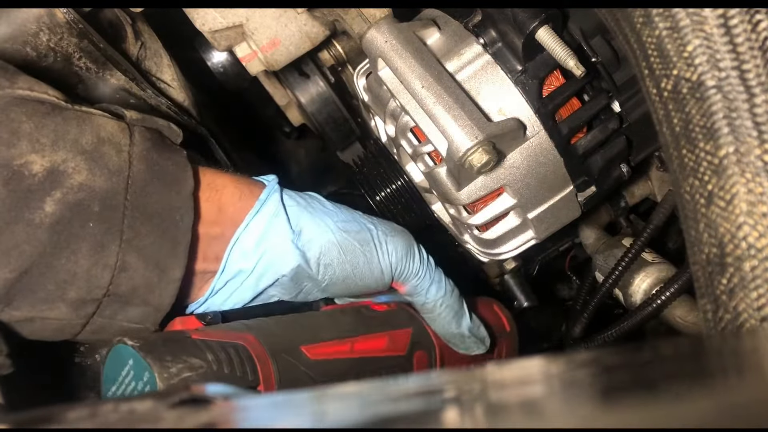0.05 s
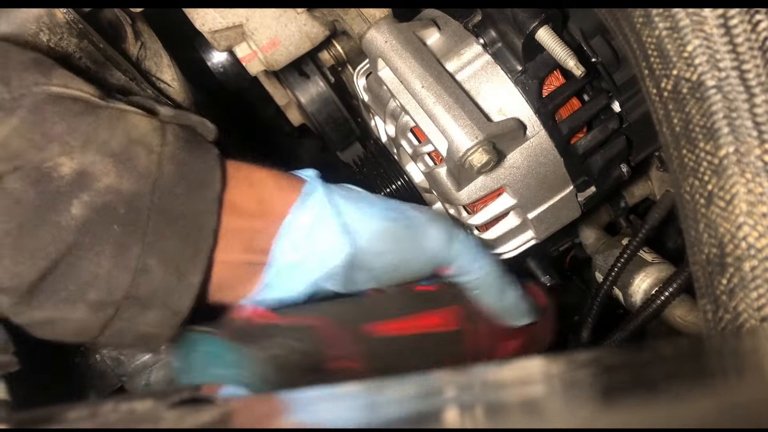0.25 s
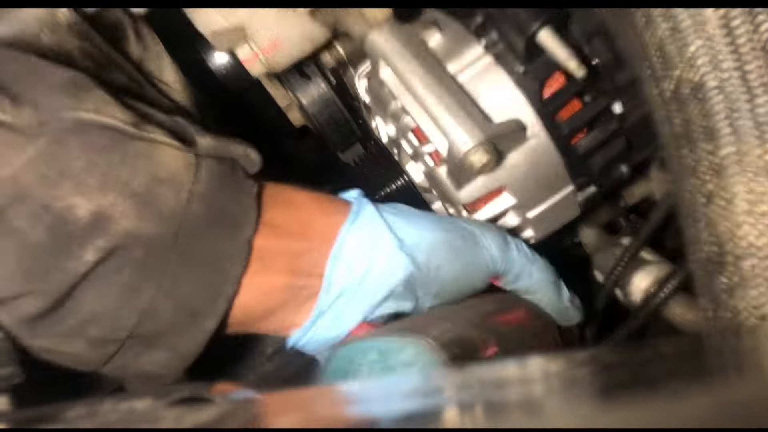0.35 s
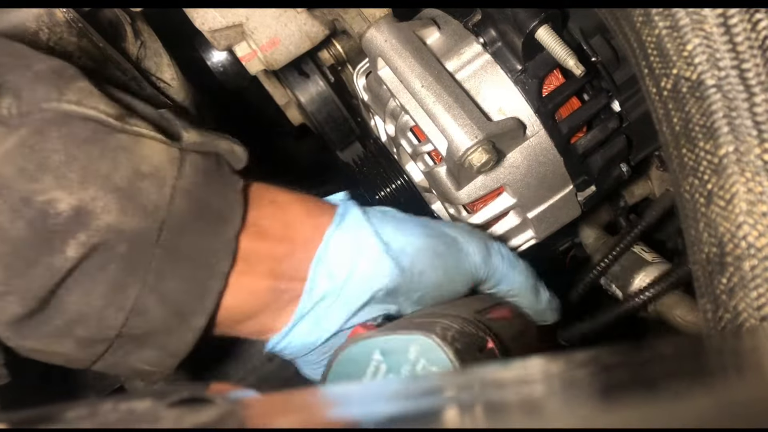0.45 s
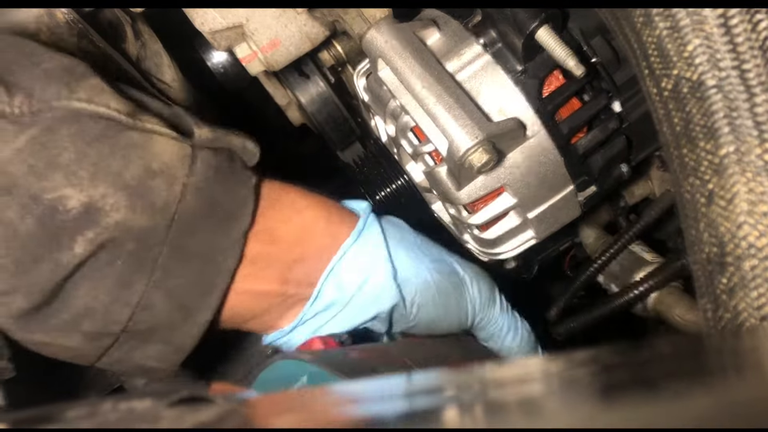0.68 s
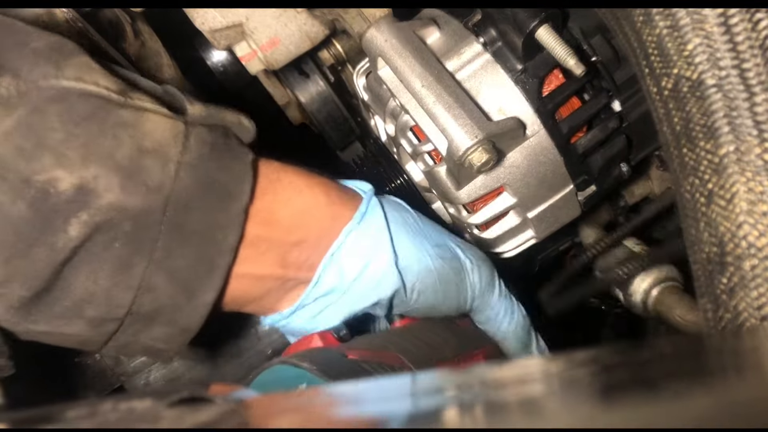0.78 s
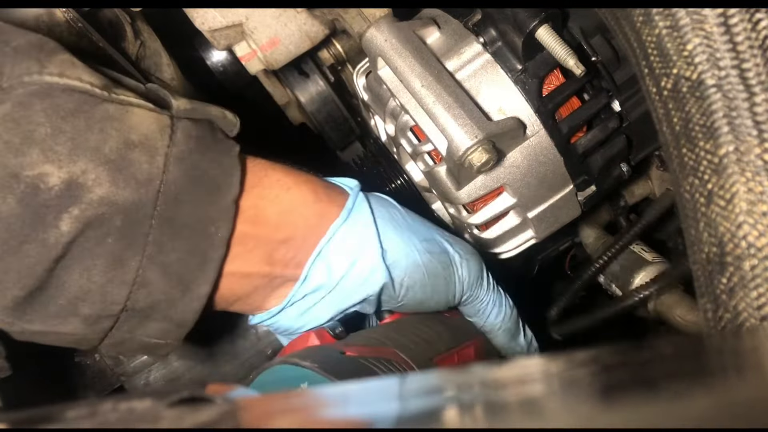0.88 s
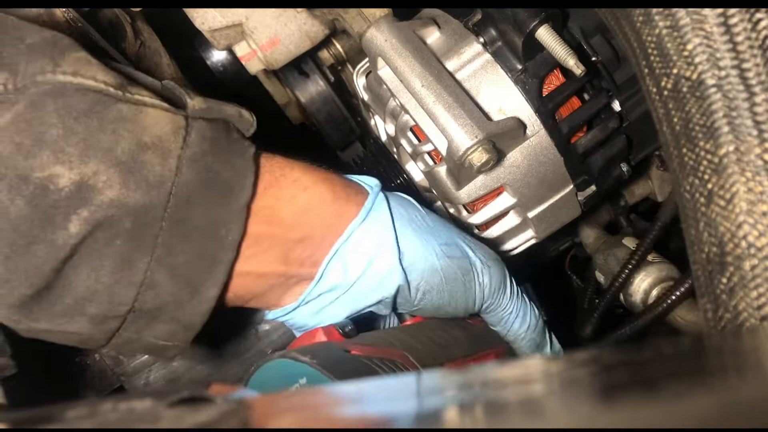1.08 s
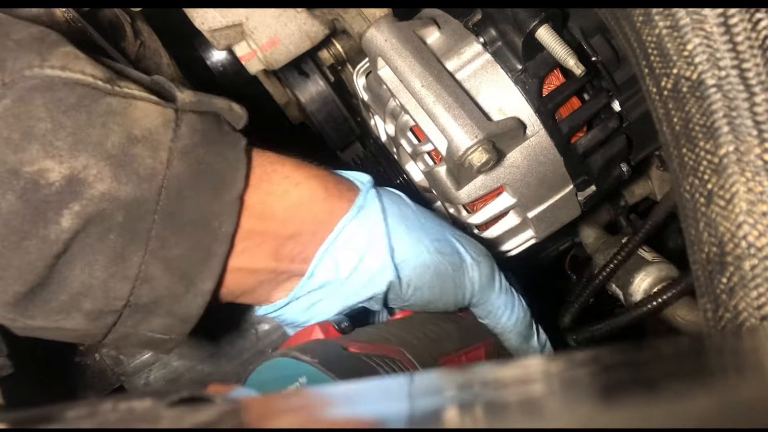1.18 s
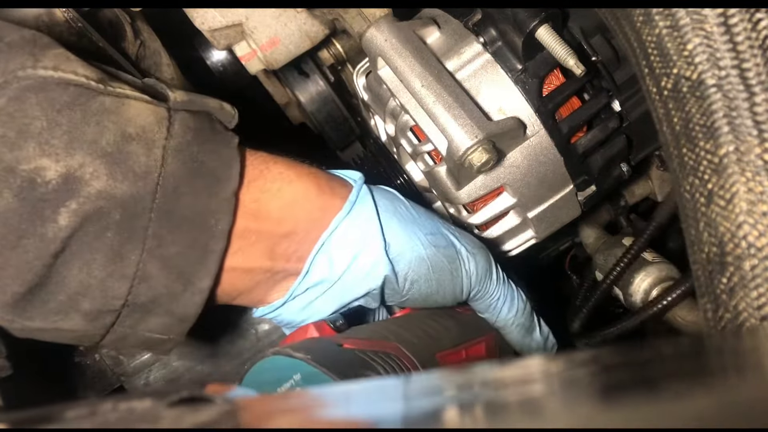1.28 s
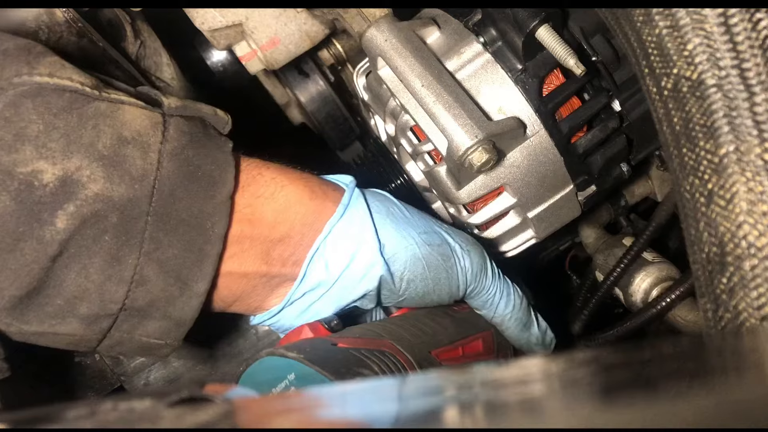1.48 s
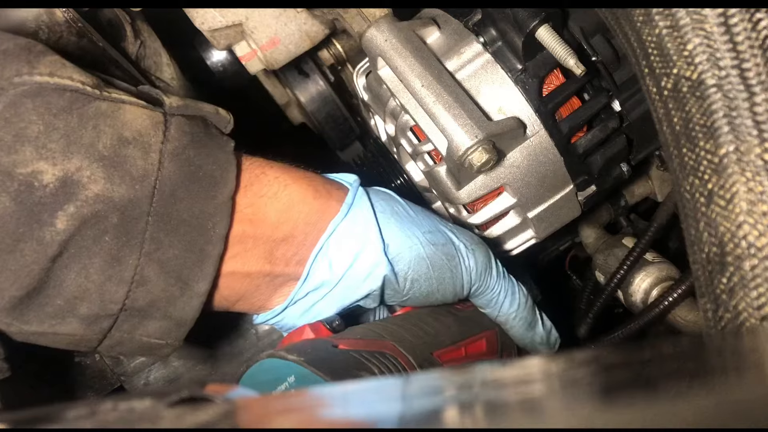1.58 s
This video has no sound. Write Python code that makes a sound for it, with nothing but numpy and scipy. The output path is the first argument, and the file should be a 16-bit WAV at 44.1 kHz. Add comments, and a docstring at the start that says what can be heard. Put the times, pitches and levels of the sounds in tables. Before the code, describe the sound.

Close mono pickup in a cramped engine bay: sharp ratchet clicks, growing plastic scrape, a cluster of clattering knocks, one more hard knock, then near quiet with tiny taps and distant rumble.

```python
"""First come pawl clicks and scraping, as a gloved hand swings a cordless ratchet back in a cramped engine bay.
A thin whine sounds briefly; the tool drags, knocks hoses and brackets, then settles with light taps.
Clicks ring tuned modes for steel, shell and bay; shaped noise adds crack, clatter, scrape and small ticks.
Distant outdoor rumble lies underneath as steady noise; everything reaches one microphone channel."""
import sys
import numpy as np
from scipy import signal
from scipy.io import wavfile

SR = 44100
rng = np.random.default_rng(int(sys.argv[2]) if len(sys.argv) > 2 else 0)


def inscribe(sig):
    """Save sig as 16-bit PCM at rate SR to the path in sys.argv[1].

    A 1-D sig is mono; a 2-D sig holds one channel per row.
    Samples are clipped to [-1, 1] before scaling.
    """
    pcm = np.round(np.clip(np.atleast_2d(sig).T, -1, 1) * 32767)
    wavfile.write(sys.argv[1], SR, pcm.astype(np.int16))


N = 72765
T = np.arange(N) / SR  # seconds

# Spectrum of the distant outdoor rumble: pitch_hz [Hz], relative density_db [dB per Hz]
OUTDOOR_SPECTRUM = [(15, -37.5), (25, -12.5), (127, 6), (242, -15.5), (476, -17.5), (695, -22), (962, -18),
                    (1610, -24), (3520, -38), (4490, -31.5), (8590, -44), (14800, -41), (16000, -44)]
# Light scuffs and ticks of small parts:
# start_s [s], level_db [dB], centre_hz [Hz], width_hz [Hz], t60_s [s]
SMALL_TICKS = [(0.605, -33, 3180, 246, 0.072), (0.824, -49, 1720, 152, 0.087),
               (0.839, -56, 4500, 4000, 0.059), (.855, -47.5, 6100, 3000, 0.076),
               (0.861, -46.5, 14300, 4000, 0.045), (.930, -57.5, 4980, 4030, 0.036),
               (1.0202, -50.5, 4500, 1790, .08), (1.0177, -58.5, 2354, 298, 0.15),
               (1.110, -61.5, 2300, 404, 0.1), (1.1236, -49.5, 4900, 4450, 0.03),
               (1.1682, -45, 2300, 500, 0.024), (1.35, -69, 4360, 834, 0.0502),
               (1.577, -52, 4140, 600, 0.048)]
# Dragging of tool and glove, breakpoints:
# time_s [s], shell_rumble_db [dB], scrape_db [dB], rustle_db [dB]
DRAG_LEVELS = [(0, -33, -44.5, -42.5), (.05, -32.5, -42, -88), (0.119, -34.5, -43, -60.5),
               (0.179, -31, -35.5, -42), (0.248, -25.5, -30, -37), (.295, -22, -29, -37),
               (.36, -27, -39.5, -47), (0.422, -38.5, -43.5, -58), (.47, -39.5, -54.5, -52),
               (.53, -53.5, -66, -73), (0.571, -37.5, -44, -58), (0.614, -34, -35.5, -55),
               (.66, -26, -64.5, -67), (.76, -55, -52.5, -61), (.81, -58, -59.5, -67), (.86, -46, -56, -66),
               (0.891, -57.5, -74.5, -85), (.97, -75.5, -68, -73), (1.05, -56.5, -64.5, -74),
               (1.09, -65, -71.5, -79.5), (1.159, -64, -67.5, -71.5), (1.3, -72.5, -70.5, -74),
               (1.389, -70.5, -65, -76), (1.49, -68, -81, -85), (1.561, -63, -64.5, -65.5),
               (1.619, -61.5, -58, -74), (1.65, -38.5, -60, -63)]
# Ring of the dragged plastic shell: pitch_hz [Hz], relative level_db [dB], t60_s [s]
SHELL_MODES = [(289.2, -5, 0.092), (452, -3, 0.11), (499.2, 0, 0.14), (643, -3, 0.05), (752.3, 3.5, 0.053),
               (946.7, -2.5, 0.087), (1230, -10.5, 0.24)]
# Colour of the scrape: pitch_hz [Hz], relative level_db [dB]
SCRAPE_SPECTRUM = [(1300, 3.5), (2000, -0.5), (3500, 4.5), (5000, 4), (7000, -2), (9000, -12)]
# Knocks of the tool on the engine: start_s [s], relative level_db at 1 kHz [dB],
# bass_tilt and treble_tilt [dB per octave], head_hz of a short ring [Hz], head_level_db [dB]
ENGINE_KNOCKS = [(.262, -18.5, 1, -6, 490, -20.5), (0.2971, -9.5, 2.5, 3.5, 2030, -17.5),
                 (0.304, -16, -2.5, -6, 390.3, -7), (0.3192, -13, 5, 1.5, 947, -8),
                 (0.3337, -17, -0.5, 2, 295.5, -3), (0.347, -20.5, 0, -2.5, 894, -11),
                 (.369, -31.5, -2.5, 1, 300, -34), (0.392, -46, -9, 9, 299, -22),
                 (0.6187, -9, 2.5, 3, 1265, -6.5), (0.639, -23.5, -4.5, -0.5, 140, -39),
                 (.665, -16.5, 5.5, -6.5, 1124, -23), (.686, -39, 26, -1.5, 308, -21.5),
                 (0.788, -43.5, -0.5, -1, 308, -49), (1.1822, -31.5, -3.5, 8, 2285, -42),
                 (1.4014, -29.5, -2, 4, 2584, -46.5)]
# Ring of the steel tool head: pitch_hz [Hz], relative level_db [dB], t60_s [s]
STEEL_MODES = [(1720, -6.5, .05), (1946, -5, 0.031), (2287, -1, 0.032), (2634, 0, 0.049), (3044, -6.5, .05),
               (3510, -7.5, 0.023), (4640, -13.5, 0.017), (5035, -3, 0.027), (6137, -11.5, 0.028)]
# Ring of the engine bay: pitch_hz [Hz], relative level_db [dB], t60_s [s]
BAY_MODES = [(127, -8, .4), (184, -10, .3), (270, -4, .25), (302, -1, .4), (370, -5, .25), (440, -4, .2),
             (502, -2, .22), (690, -11, .2), (757, -6, .12), (895, -6, .12), (927, 0, .2), (1132, -7, .22),
             (1250, -8, .1), (1510, -10, .14)]
# Colour of the loose-part clatter: pitch_hz [Hz], relative level_db [dB]
CLATTER_SPECTRUM = [(100, -14), (300, -8.5), (1000, -6), (2500, -4), (5000, -8.5), (8000, -24.5),
                    (16000, -39)]
# Decay of the clatter by band: pitch_hz [Hz], t60_s [s]
CLATTER_DECAY = [(100, 0.17), (260, 0.27), (700, 0.16), (1840, 0.072), (4850, 0.047)]
# Pawl drops over a tooth: start_s [s], relative level_db [dB], crack_db relative to it [dB]
PAWL_DROPS = [(.0098, -16, -8), (0.037, -41.5, 7), (0.0597, -32.5, -2), (0.0792, -16, -8.5),
              (0.106, -38, 8), (0.1373, -34, 9.8), (0.154, -20, -16), (0.188, -24.5, 5),
              (0.1997, -16.5, -8), (.223, -30, 3.5), (0.2292, -13.5, -11), (0.261, -14, -8),
              (0.288, -26.5, 6), (0.2962, -14, 2), (0.3337, -17.5, -17.5), (0.373, -37, -9),
              (0.3903, -22.5, -22)]
# Ring of pawl and gear: pitch_hz [Hz], relative level_db [dB], t60_s [s]
PAWL_MODES = [(9450, -10, .012), (10200, -8, .012), (11090, -3, .018), (11640, 0, .018), (12000, -1, .018),
              (12670, 0, .018), (12960, 0, .018), (13630, -7, .012), (13860, -6, .012), (14370, -5, .012),
              (14800, -7, .012), (15250, -6, .012)]

RUMBLE_DB = -51
WHINE_START_S, WHINE_END_S, WHINE_EDGE_S = 0.021, 0.108, 0.002
WHINE_HZ, WHINE_DB, WHINE_OCTAVE_DB = 4558, -42, -22  # the octave is relative to the tone
GRAINS_PER_S, GRAIN_SPREAD_DB, RUB_LOW_HZ = 1500, 3.5, 197
WAVER, WAVER_HZ = 0.03, 8  # typical share of pitch wander as the grip shifts, knots per second
STEEL_DB, STEEL_RATTLE_S, STEEL_SNAP_DB = -28, 0.016, 12
HEAD_T60_S, BAY_DB, CLATTER_DB = 0.065, -12.5, -9.5
BASS_LAG_CYCLES, THUD_LOW_HZ = 1.473, 90
PAWL_DB, PAWL_SNAP_DB, CHATTER_T60_S, CRACK_T60_S = -29, 21, 0.041, 0.03
CUTOFF_HZ = 16250


def amp(db):
    """Decibels to amplitude."""
    return 10 ** (np.asarray(db) / 20)


def rms_one(x):
    """Scales a signal to rms 1."""
    return x / np.sqrt(np.mean(x ** 2) + 1e-20)


def at_hz(points, hz):
    """Reads a table between its points along log frequency."""
    table = np.array(points)
    return np.interp(np.log(hz), np.log(table[:, 0]), table[:, 1])


def butter(x, order, hz, kind):
    """Butterworth filter of the given kind."""
    return signal.sosfilt(signal.butter(order, hz, kind, fs=SR, output="sos"), x)


def train(s, size):
    """Clicks of the given sizes at the given times."""
    clicks = np.zeros(N)
    places = np.clip((np.asarray(s) * SR).astype(int), 0, N - 1)
    np.add.at(clicks, places, size)
    return clicks


def dying(clicks, t60):
    """Each click starts an exponentially decaying envelope."""
    return signal.lfilter([1], [1, -amp(-60 / (t60 * SR))], clicks + 1e-18)


def ring(drive, hz, t60):
    """A two-pole resonance: a unit click starts a decaying sine of initial height 1."""
    r = amp(-60 / (t60 * SR))
    w = 2 * np.pi * hz / SR
    return signal.lfilter([0, np.sin(w)], [1, -2 * r * np.cos(w), r * r], drive + 1e-18)


def bands(rows, low, high):
    """Third-octave slices from alternating rows: (centre Hz, slice of rms 1)."""
    edges = low * 2 ** np.arange(0, np.log2(high / low), 1 / 3)
    for k, (a, b) in enumerate(zip(edges, edges[1:])):
        yield np.sqrt(a * b), rms_one(butter(rows[k % 2], 2, [a, b], "band"))


def grains():
    """Dense clicks of rubbing, uneven in size and random in sign."""
    sizes = amp(GRAIN_SPREAD_DB * np.minimum(rng.exponential(1, N), 5))
    signs = rng.choice([-1, 1], N)
    return sizes * signs * (rng.random(N) < GRAINS_PER_S / SR)


def waver(x):
    """Reads a signal at a slowly wandering speed, so its pitch wanders."""
    knots = rng.standard_normal(int(WAVER_HZ * N / SR) + 2)
    speed = 1 + WAVER * np.interp(T * WAVER_HZ, np.arange(len(knots)), knots)
    return np.interp(np.cumsum(speed) % (N - 1), np.arange(N), x)


def outdoors():
    """Steady far rumble and air: noise bands weighted by a density spectrum."""
    mix = 0
    for hz, noise in bands(rng.standard_normal((2, N)), 21.93, 20000):
        # Band width grows with frequency, hence the square root.
        mix = mix + amp(at_hz(OUTDOOR_SPECTRUM, hz)) * np.sqrt(hz) * noise
    return amp(RUMBLE_DB) * rms_one(mix)


def whine():
    """Probably the motor's switching as the trigger is brushed: a steady tone and its octave."""
    gate = np.clip(np.minimum(T - WHINE_START_S, WHINE_END_S - T) / WHINE_EDGE_S, 0, 1)
    phase = 2 * np.pi * WHINE_HZ * T
    tone = np.sin(phase) + amp(WHINE_OCTAVE_DB) * np.sin(2 * phase)
    return np.sqrt(2) * amp(WHINE_DB) * gate * tone


def ticks():
    """Small parts scuff and tick: each a dying puff of noise through one band."""
    out, noise = 0, rng.standard_normal(N)
    for s, db, hz, width_hz, t60 in SMALL_TICKS:
        edges = [max(hz - width_hz / 2, 50), min(hz + width_hz / 2, 20000)]
        puff = noise * dying(train([s], amp(db)), t60)
        # Narrow bands are raised to make up for the power they discard.
        out = out + np.sqrt(SR / 2 / width_hz) * butter(puff, 2, edges, "band")
    return out


def drag():
    """Rubbing grains drive the shell's modes, a mid scrape and a noisy bright rustle."""
    s, *columns = np.transpose(DRAG_LEVELS)
    rumble_gain, scrape_gain, rustle_gain = [amp(np.interp(T, s, c)) for c in columns]
    rub = grains()
    rumble = sum(amp(db) * ring(rub, hz, t60) for hz, db, t60 in SHELL_MODES)
    rumble = waver(butter(rumble, 4, RUB_LOW_HZ, "high"))
    scrape = sum(amp(at_hz(SCRAPE_SPECTRUM, hz)) * b for hz, b in bands([rub, grains()], 1327, 9500))
    rustle = butter(rng.standard_normal(N) + 0.21 * rub, 2, 7500, "high")
    return rumble_gain * rms_one(rumble) + scrape_gain * rms_one(scrape) + rustle_gain * rms_one(rustle)


def steel(s, level):
    """A knock's snap and short rattle set the tool head's modes ringing."""
    noise, out = rng.standard_normal(N), 0
    for hz, db, t60 in STEEL_MODES:
        hits = train(s, amp(level(hz) + db + STEEL_DB))
        rattle = noise * dying(hits, STEEL_RATTLE_S)
        out = out + ring(rattle + amp(STEEL_SNAP_DB) * hits, hz, t60)
    return out


def bay(s, level):
    """The bay's modes ring after each knock, lower ones later, with uneven strength and sign."""
    out = 0
    for hz, mode_db, t60 in BAY_MODES:
        luck_db = rng.normal(0, 2, len(s))
        size = amp(level(hz) + mode_db + BAY_DB + luck_db)
        signs = rng.choice([-1, 1], len(s))
        out = out + ring(train(s + BASS_LAG_CYCLES / hz, size * signs), hz, t60)
    return out


def clatter(s, level):
    """Loose parts clatter as decaying noise bands, the lower ones swelling more slowly."""
    out = 0
    for hz, noise in bands(rng.standard_normal((2, N)), 90, 20000):
        swell = np.exp(-hz / (BASS_LAG_CYCLES * SR))
        size = amp(level(hz) + CLATTER_DB + at_hz(CLATTER_SPECTRUM, hz))
        hits = dying(train(s, size), at_hz(CLATTER_DECAY, hz))
        out = out + noise * signal.lfilter([1 - swell], [1, -swell], hits)
    return out


def knocks():
    """Each knock rings the tool head and the bay and shakes loose parts, its level tilted about 1 kHz."""
    s, db, bass, treble, head_hz, head_db = np.transpose(ENGINE_KNOCKS)

    def level(hz):
        """Level of every knock at one frequency, in dB."""
        return db + np.log2(hz / 1000) * (bass if hz < 1000 else treble)

    head = sum(ring(train([a], amp(d)), hz, HEAD_T60_S) for a, hz, d in zip(s, head_hz, head_db))
    out = steel(s, level) + head + bay(s, level) + clatter(s, level)
    return butter(out, 3, THUD_LOW_HZ, "high")


def pawl():
    """Each drop's snap and dying chatter ring the pawl, with a duller crack through the handle."""
    s, db, crack_db = np.transpose(PAWL_DROPS)
    noise = rng.standard_normal((3, N))
    drops = train(s, amp(db + PAWL_DB))
    chatter = dying(drops, CHATTER_T60_S)
    bright = 0
    for k, (hz, mode_db, t60) in enumerate(PAWL_MODES):
        snap = amp(PAWL_SNAP_DB) * (-1) ** k * drops  # neighbouring modes start in opposite sign
        bright = bright + amp(mode_db) * ring(chatter * noise[k % 2] + snap, hz, t60)
    crack = rms_one(butter(noise[2], 2, (1800, 9000), "band"))
    return bright + crack * dying(train(s, amp(db + crack_db - 5)), CRACK_T60_S)


def scene():
    """All layers, from far outdoors to the ratchet, on one channel."""
    return (outdoors() + whine() + ticks() + drag() + knocks() + pawl())[None, :]


def record(dry):
    """The microphone channel: peaks are rounded softly and the top is cut steeply."""
    rounded = 1.478 * np.tanh(dry / 1.56)
    return signal.sosfilt(signal.cheby2(20, 45, CUTOFF_HZ, fs=SR, output="sos"), rounded)


dry = scene()
out = record(dry)
inscribe(out)
```